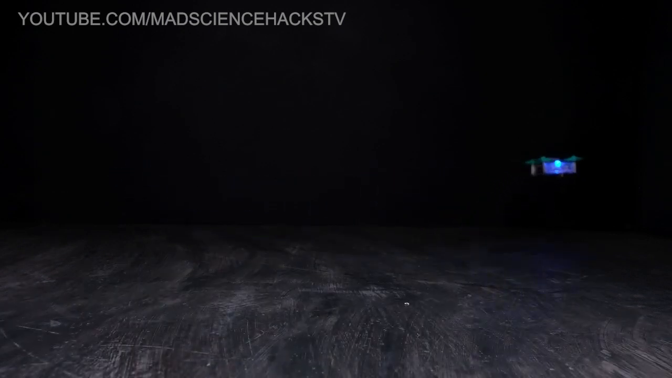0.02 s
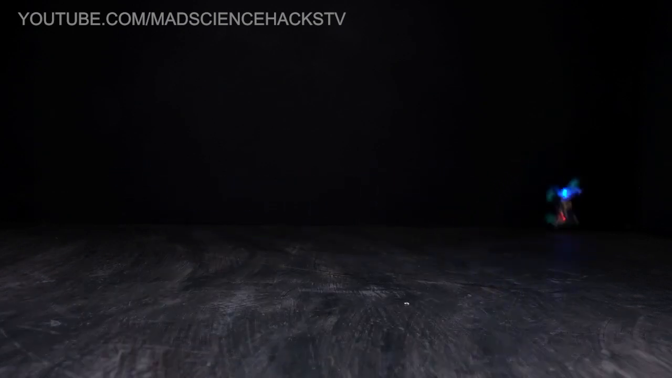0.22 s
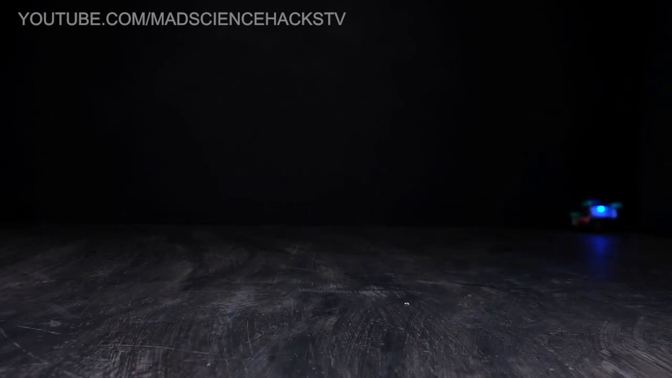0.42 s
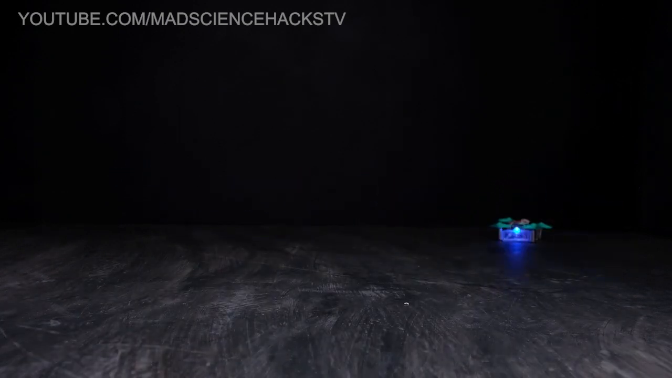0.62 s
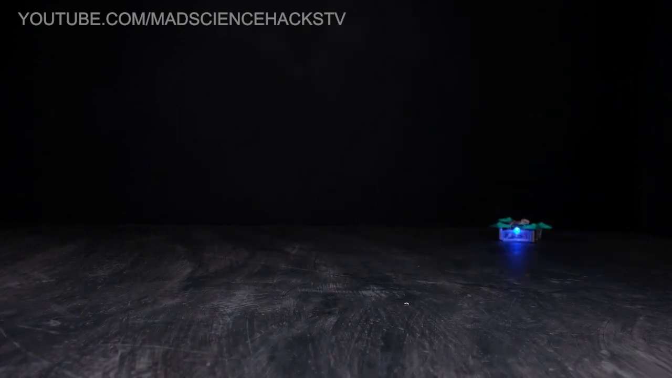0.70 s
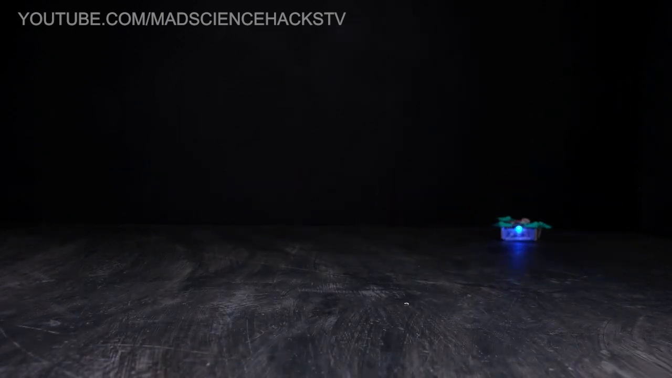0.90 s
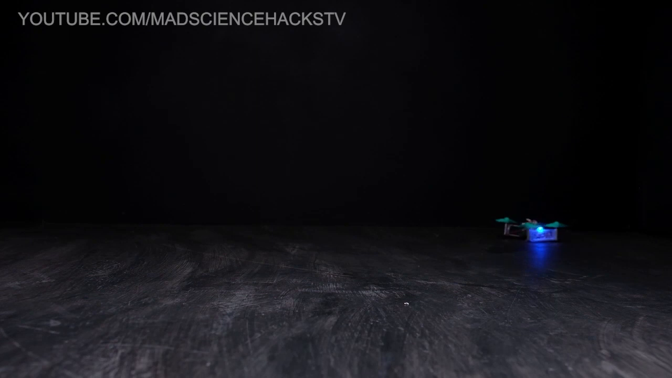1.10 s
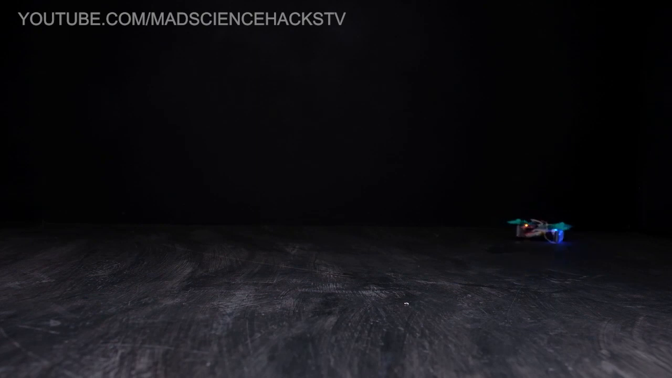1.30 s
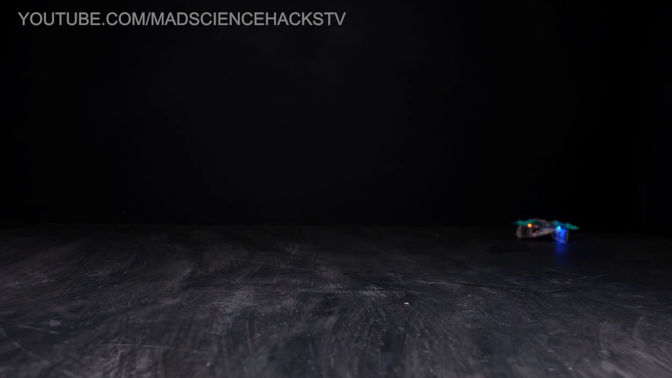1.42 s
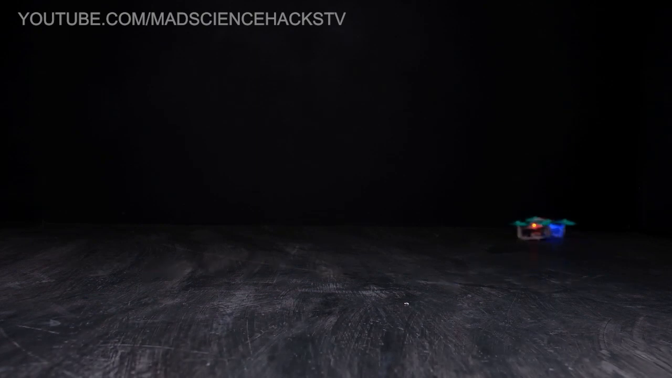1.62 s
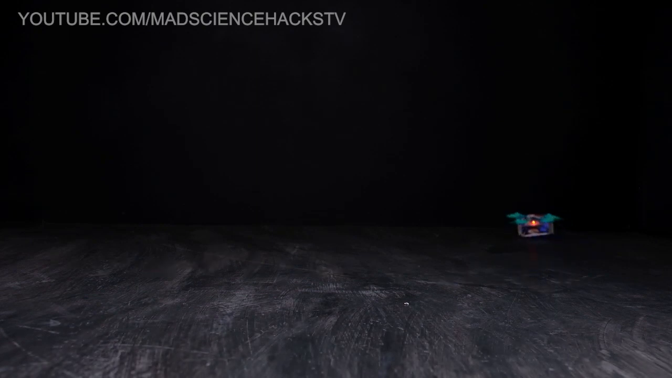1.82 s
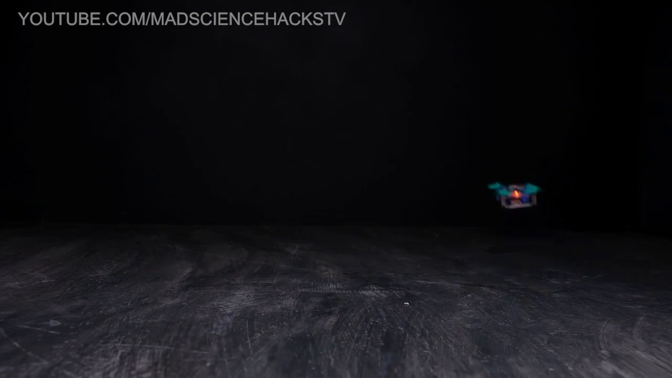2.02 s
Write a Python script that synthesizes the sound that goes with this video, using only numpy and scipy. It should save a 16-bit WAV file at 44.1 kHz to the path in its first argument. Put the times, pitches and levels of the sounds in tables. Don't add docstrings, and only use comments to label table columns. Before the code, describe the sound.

Small four-rotor drone buzzes, smashes onto the floor and tumbles, then idles, hops and lifts off

```python
import sys
import numpy as np
from scipy import signal
from scipy.fft import rfft, irfft, next_fast_len
from scipy.io import wavfile
from scipy.ndimage import uniform_filter1d

SR = 44100
rng = np.random.default_rng(int(sys.argv[2]) if len(sys.argv) > 2 else 0)


def wrap_up_sound(samples):
    columns = np.atleast_2d(samples).T
    tamed = np.clip(columns, -1, 1)
    steps = np.round(tamed * 32767).astype(np.int16)
    wavfile.write(sys.argv[1], SR, steps)


def amplitude_ratio(level_db):
    exponent = np.asarray(level_db, float) / 20
    return 10 ** exponent


N = 90405
T = np.arange(N) / SR

CRASH_S, KNOCK_S, CUT_S = .2072, .5746, .6877
IDLE_HZ, CLIMB_S, CLIMB_HZ = 1432, 1.84, 1610
WOBBLE_CLIMB = .055
# touch-down [t/s], blade tone there [f/Hz], top of the surge [t/s], blade tone at the top [f/Hz],
# thud [level/dB]
HOPS = [
    (.872, 1405, .955, 1950, -70),
    (1.075, 1420, 1.13, 1850, -45),
    (1.212, 1460, 1.258, 1890, -59),
    (1.338, 1430, 1.382, 1830, -54),
    (1.458, 1350, 1.505, 1790, -55),
    (1.597, 1360, 1.642, 1820, -55),
    (1.732, 1290, 1.778, 1820, -55),
]
LAGS = rng.uniform(.011, .037, 10)


def rms_one(x):
    return x / np.sqrt(np.mean(x ** 2) + 1e-20)


def in_time(rows):
    return np.interp(T, *np.transpose(rows))


def drift(rate):
    r = np.exp(-80 * np.pi * rate / SR)
    slow = signal.lfilter([1], [1, -2 * r, r * r], rng.standard_normal(N // 40 + 2002))[2000:]
    return np.interp(np.arange(N) / 40, np.arange(len(slow)), rms_one(slow))


def smooth(x, s):
    return uniform_filter1d(x, size=max(int(s * SR), 1))


def coloured(points):
    hz = np.maximum(np.fft.rfftfreq(N, 1 / SR), 1)
    p = np.array(points)
    gain = amplitude_ratio(np.interp(np.log(hz), np.log(p[:, 0]), p[:, 1]))
    return rms_one(irfft(rfft(rng.standard_normal(N)) * gain, N))


def band_noise(order, low, high):
    sos = signal.butter(order, [low, high], "band", fs=SR, output="sos")
    return signal.sosfilt(sos, rng.standard_normal(N))


def resonate(x, peaks):
    out = 0
    for k, (hz, width, db) in enumerate(peaks):
        r = np.exp(-np.pi * width / SR)
        zeros = [(1 - r * r) / 2, 0, (r * r - 1) / 2]
        poles = [1, -2 * r * np.cos(2 * np.pi * hz / SR), r * r]
        out = out + (-1) ** k * amplitude_ratio(db) * signal.lfilter(zeros, poles, x + 1e-18)
    return out


def room(x):
    t60_s, wall_cut_hz = 0.4, 2300
    size = next_fast_len(2 * N)
    w = 2j * np.pi * np.fft.rfftfreq(size, 1 / SR)
    wall = np.abs(1 + (w / (2 * np.pi * wall_cut_hz)) ** 2 / -4)
    loops = [amplitude_ratio(-60 * lag / t60_s) * np.exp(-w * lag) / wall for lag in LAGS]
    echoes = sum((-1) ** k * g / (1 - g) for k, g in enumerate(loops))
    return irfft(rfft(x, size) * echoes, size)[:N]


def throttle():
    turns = [(CUT_S, IDLE_HZ)]
    for s, low, top_s, top, _ in HOPS:
        spurt = (s + .6 * (top_s - s), low + .87 * (top - low))
        turns += [(s, low), spurt, (top_s, top)]
    turns.append((CLIMB_S, CLIMB_HZ))
    return np.where(T >= CUT_S, smooth(in_time(turns), .015), 1500)


def rotors(blade, wobble, after):
    # speed before the cut [share], level [level/dB], speed after it [share],
    # level [level/dB], wobble phase [turns]
    rotor_set = [
        (1.035, 3.5, 1.001, 0.1, .6),
        (.975, -3, .948, -7, .1),
        (.81, -5, .99, -12, .1),
        (.72, -11, .96, -15, .5),
    ]
    # multiple of shaft speed [ratio], strength [level/dB]
    orders = [(1, -15), (2, -24), (3, -19), (4, 0), (5, -17), (6, -15), (7, -15), (8, -8), (9, -18),
              (10, -15), (11, -12), (12, -9), (13, -18), (14, -21), (15, -15), (16, -17), (17, -24),
              (18, -23), (19, -21), (20, -20), (21, -18), (22, -22), (23, -21), (24, -20)]
    # multiple of shaft speed [ratio], strength [level/dB]
    smears = [(8, -10.5), (11, -18.5), (12, -14), (17, -10)]
    wobble_per_s, wander, lag_s, swing_loss = 22.5, .014, .004, .1
    flutter_db, smear_hz, airborne_shaft_db = 3.0, 110, -4
    busy = np.clip((T - HOPS[0][0]) / .05, .15, 1) + .2 * (T < CUT_S)
    airborne = wobble > .02
    tone, chop = 0, 0
    for k, (early, early_db, late, late_db, turn) in enumerate(rotor_set):
        lagged = np.interp(T - k * lag_s * (T > CUT_S + .1), T, blade)
        pull = swing_loss * k * np.clip(busy * 1.18 - .18, 0, 1) * after
        lagged = lagged + pull * (CLIMB_HZ - lagged)
        waver = 1 + wobble * np.sin(2 * np.pi * (wobble_per_s * T + turn)) + wander * busy * drift(18)
        hz = lagged * np.where(after, late, early) * waver
        phase = 2 * np.pi * np.cumsum(hz / 4) / SR
        gain = amplitude_ratio(np.where(after, late_db, early_db) + 3.0 * busy * (k > 0) * after)
        flutter = [amplitude_ratio(flutter_db * share * busy * drift(45)) for share in (1, 1.6, 1.5)]
        start = rng.uniform(0, 2 * np.pi, len(orders))
        for i, (m, db) in enumerate(orders):
            load_db = -6 * busy * (m > 6) + airborne_shaft_db * (m == 1) * airborne
            tone = tone + gain * amplitude_ratio(db) * flutter[i % 3] * amplitude_ratio(load_db) * np.sin(m * phase + start[i])
        smeared = sum(amplitude_ratio(db) * drift(smear_hz) * np.sin(m * phase) for m, db in smears)
        tone = tone + gain * np.minimum(busy + .02, 1) * after * smeared
        chop = chop + np.sin(phase)
    return tone, chop


def air_wash(octaves, chop, after):
    # frequency [f/Hz], density [level/dB per Hz]
    wash_floor = [(30, -11.5), (190, -18.5), (420, -12.5), (1000, -12.5), (2400, -12), (3300, -9),
                  (9000, -9.5), (16000, -24.5)]
    # frequency [f/Hz], density [level/dB per Hz]
    wash_flight = [(30, -32), (480, -34.5), (1100, -19.5), (1600, -15), (2200, -29), (8700, -28),
                   (16000, -35)]
    base_db, db_per_oct, chop_depth = -4.5, 11, 0.27
    level = amplitude_ratio(base_db + db_per_oct * octaves + 1.0 * drift(16.0))
    noise = np.where(after, coloured(wash_floor), amplitude_ratio(8.5) * coloured(wash_flight))
    return level * (1 + chop_depth * chop / 2) * noise


def motors():
    # time [t/s], level [level/dB]
    motor_level = [(0, -49), (.2, -49.5), (.69, -44), (.86, -44), (.95, -43), (1.03, -44.5), (1.4, -47),
                   (1.75, -44.5), (2.05, -43.5)]
    # centre [f/Hz], width [f/Hz], level [level/dB]
    housing = [(3430, 500, 1.5), (4600, 350, 2.5), (5400, 250, -3), (7600, 400, -2.5), (9000, 500, -5),
               (10950, 200, -3), (12200, 300, -1.5)]
    tone_db_per_oct, climb_tone_db, room_db = 7.0, 2.2, -14
    tip_db, tip_hz, tip_rise_s = -47.5, 9000, 0.4
    after = T >= CUT_S
    blade = throttle()
    octaves = np.log2(blade / IDLE_HZ)
    wobble = np.where(after, WOBBLE_CLIMB * np.clip((T - CLIMB_S) / 0.05, 0, 1), .035)
    tone, chop = rotors(blade, wobble, after)
    tone_gain = amplitude_ratio(tone_db_per_oct * octaves + climb_tone_db * after * wobble / WOBBLE_CLIMB)
    sound = amplitude_ratio(in_time(motor_level)) * (tone_gain * tone + air_wash(octaves, chop, after))
    tip_rise = np.clip((T - HOPS[0][0]) / tip_rise_s, .15, 1)
    sound = sound + amplitude_ratio(tip_db) * tip_rise * after * band_noise(4, tip_hz, 16500)
    sound = sound + sum(resonate(sound, [peak]) for peak in housing)

    def in_room(x):
        return x + amplitude_ratio(room_db) * room(x)

    dying = np.exp(-np.maximum(T - CRASH_S, 0) / .05) * ~after
    lead_in = np.roll(sound, -int(.17 * SR)) * (T > CUT_S - .17)
    return in_room(sound * dying) * ~after + in_room(np.where(after, sound, lead_in)) * after


def drag_hum():
    # start [t/s], end [t/s], pitch [f/Hz], level [level/dB]
    drags = [
        (.215, .40, 382, -41),
        (.39, .57, 490, -45),
        (.29, .57, 130, -47),
        (.45, .56, 616, -50),
        (-.05, .21, 100, -64),
    ]
    hum = 0
    for a, b, hz, db in drags:
        gate = smooth(1. * (T > a) * (T < b), .02)
        level = amplitude_ratio(db + 2 * drift(20))
        hum = hum + level * gate * np.sin(2 * np.pi * hz * np.cumsum(1 + .012 * drift(10)) / SR)
    return hum


def puff_shape(t):
    return np.minimum(t * 9, 1) * np.exp(-t ** 1.6)


def clatter():
    # time [t/s], level [level/dB], length [t/s], centre of the colour [f/Hz]
    contacts = [(0.2073, -2, 0.0029, 2090), (0.2089, 1, 0.0034, 2700), (0.2148, -6, 0.0025, 1940),
                (.263, -19, 0.0041, 9000), (0.283, -17.5, 0.0037, 6200), (0.3509, -13.5, 0.009, 7000),
                (0.369, -25.5, 0.017, 6560), (0.4135, -23.5, 0.004, 7400), (0.4567, -21.5, 0.0097, 5600),
                (0.465, -26.5, 0.012, 6540), (0.479, -29.5, 0.011, 5960), (0.493, -30, 0.032, 5000)]
    # centre [f/Hz], width [f/Hz], level [level/dB]
    frame = [(390, 70, 0.5), (1070, 200, -5), (1520, 420, -2), (2150, 450, -1), (3200, 600, -5),
             (4400, 1200, -9), (9000, 4000, -12)]
    # centre [f/Hz], width [f/Hz], level [level/dB]
    parts = [(1540, 900, -6), (3940, 720, -7.5), (5810, 930, -7), (6690, 220, -3), (7320, 290, -6.5),
             (7600, 130, -1), (8500, 660, -6.5), (10930, 540, -7.5), (11130, 1550, -7), (13900, 470, -9),
             (15000, 1300, -19)]
    # time [t/s], level [level/dB]
    skid_level = [(.21, -28), (.26, -32.5), (.34, -31.5), (.36, -28.5), (.41, -30), (.5, -38), (.56, -44.5),
                  (.6, -41), (.64, -51), (.688, -54)]
    colour_db_per_oct = 8
    grains = rng.standard_normal((2, N)) * amplitude_ratio(2.5 * np.minimum(rng.exponential(1, (2, N)), 3))
    grains = rms_one(grains)
    s, db, length, hz = np.transpose(contacts)[:, :, None]
    shapes = amplitude_ratio(db) * puff_shape(np.maximum(T[:SR] - s, 0) / length)
    skid = (T > CRASH_S) * amplitude_ratio(in_time(skid_level) + 1.5 * drift(40))
    out = 0
    for body, noise, rub in ((frame, grains[0], .35), (parts, grains[1], 1.01)):
        for k, mode in enumerate(body):
            drive = amplitude_ratio(-colour_db_per_oct * np.abs(np.log2(mode[0] / hz[:, 0])))
            shower = np.pad(drive @ shapes, (0, N - SR))
            out = out + (-1) ** k * amplitude_ratio(10) * resonate(noise * (shower + rub * skid), [mode])
    return out


def ticks():
    # time [t/s], level [level/dB], length [t/s], centre [f/Hz], width [f/Hz]
    tick_list = [(0.21, -10, 0.0026, 9000, 2500), (.209, -9.5, 0.0024, 13700, 2000),
                 (0.234, -33, 0.023, 1030, 87.5), (0.265, -25, .006, 8000, 1300),
                 (0.262, -24, .004, 12800, 2500), (0.269, -23, .001, 12000, 3000),
                 (.2835, -24, 0.0016, 12500, 2000), (.3545, -16, 0.0012, 7000, 4000),
                 (0.355, -23, 0.0048, 1700, 900), (0.375, -23, 0.0017, 7500, 3000),
                 (0.378, -26, .0015, 7050, 4000), (0.414, -17.5, 0.0014, 5030, 4000),
                 (0.415, -29, .0015, 7600, 2980), (0.413, -29, 0.0055, 13900, 900),
                 (0.4584, -17.5, 0.0024, 6600, 2480), (0.462, -42, 0.0077, 14000, 900),
                 (0.513, -23, 0.0026, 5250, 3970), (.545, -38, 0.022, 7460, 250),
                 (.574, -34, .001, 12600, 3500), (.5755, -32, 0.0022, 8500, 2470),
                 (.5935, -39, .0015, 13000, 1500), (.643, -40, 0.0012, 12300, 2000),
                 (0.649, -30.5, .002, 4460, 2500), (0.36, -33.5, 0.043, 7440, 600),
                 (0.423, -31, .03, 7460, 450), (0.463, -31, 0.026, 7380, 600),
                 (0.514, -38, 0.036, 7500, 450)]
    out, noise = np.zeros(N), rng.standard_normal((len(tick_list), 4000))
    for (s, db, length, hz, width), puff in zip(tick_list, noise):
        t = np.arange(len(puff)) / SR / length
        peak = [(hz, width, 0)]
        gain = np.sqrt(np.mean(resonate(resonate(puff, peak), peak) ** 2))
        rung = resonate(resonate(puff * puff_shape(t), peak), peak) / gain
        out[int(s * SR):int(s * SR) + len(puff)] += amplitude_ratio(db) * rung
    return out


def rumble():
    # time [t/s], level [level/dB]
    tumble_level = [(.21, -26.5), (.25, -37), (.3, -37.5), (.55, -42.5), (.572, -46)]
    # frequency [f/Hz], density [level/dB per Hz]
    tumble_colour = [(18, -50), (30, -12.5), (367, -6), (490, -0.5), (841, -4.5), (1850, -10.5),
                     (3000, -13), (3900, -13.5), (6600, -120)]
    # time [t/s], level [level/dB]
    roll_level = [(.577, -24), (.59, -31.5), (.62, -33), (.66, -40), (.688, -47)]
    # frequency [f/Hz], density [level/dB per Hz]
    board_colour = [(35, -18), (75, 0.5), (150, -7.5), (400, -2.5), (1200, -2.5), (2800, -11),
                    (4600, -12.5), (9000, -43)]
    rolling = amplitude_ratio(in_time(roll_level)) * coloured(board_colour)
    tumbling = amplitude_ratio(in_time(tumble_level)) * coloured(tumble_colour)
    return (T > CRASH_S) * amplitude_ratio(drift(58)) * np.where(T > KNOCK_S + .001, rolling, tumbling)


def last_knock():
    # centre [f/Hz], width [f/Hz], level [level/dB]
    board_modes = [(1060, 260, 12), (2600, 500, 15.5), (3500, 900, 5)]
    blow = np.zeros(N)
    blow[int(KNOCK_S * SR)] = 1
    return resonate(blow, board_modes)


def crash():
    hits = clatter() + ticks() + last_knock()
    return (hits + amplitude_ratio(-21.5) * room(hits) + drag_hum() + rumble()) * (T < CUT_S)


def thuds():
    thud_s, late_s, thud_db, boom_db, buzz_db = 0.027, 0.0095, -3, -40, -67
    push = sum(amplitude_ratio(h[4] + thud_db) * np.exp(-((T - h[0] - late_s) / thud_s) ** 2) for h in HOPS)
    push = push + amplitude_ratio(boom_db) * (T > KNOCK_S + .02) * (T < CUT_S)
    hopping = smooth(1. * (T > HOPS[0][2]) * (T < HOPS[-1][2]), 0.046)
    push = push + amplitude_ratio(buzz_db + 5.3 * drift(32)) * hopping
    return push * rms_one(band_noise(2, 110, 346))


def scene():
    return (motors() + crash() + thuds())[None]


def band_limit(x):
    return signal.sosfilt(signal.butter(12, 15790, fs=SR, output="sos"), x)


def record(dry):
    rounded = .97 * np.tanh(dry / .97)
    mix = signal.sosfilt(signal.cheby2(10, 40, 17500, fs=SR, output="sos"), rounded)
    return band_limit(mix)


dry = scene()
out = record(dry)
wrap_up_sound(out)
```